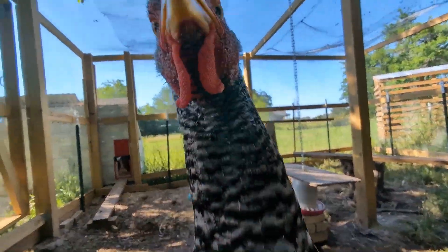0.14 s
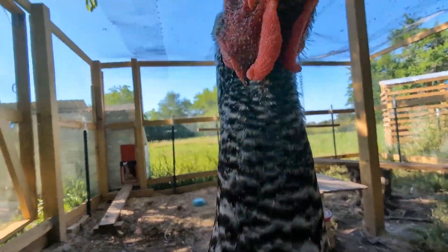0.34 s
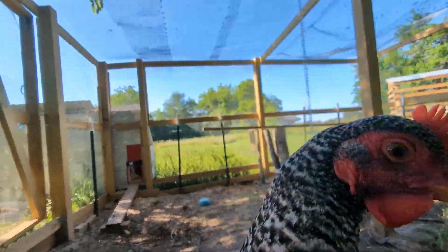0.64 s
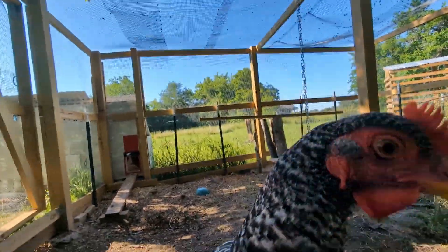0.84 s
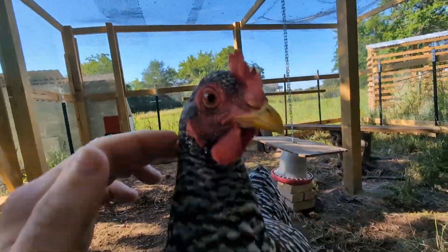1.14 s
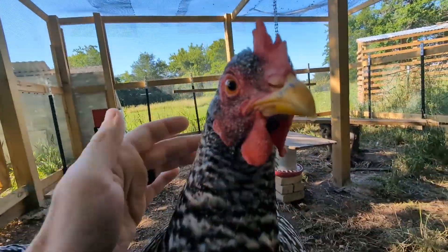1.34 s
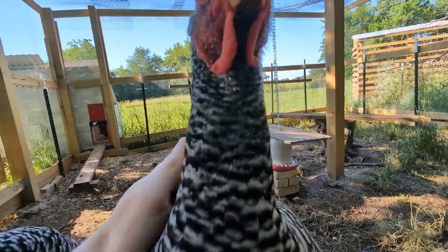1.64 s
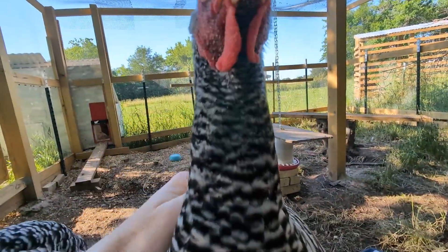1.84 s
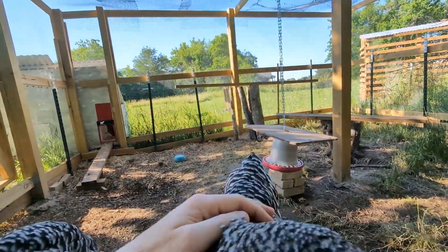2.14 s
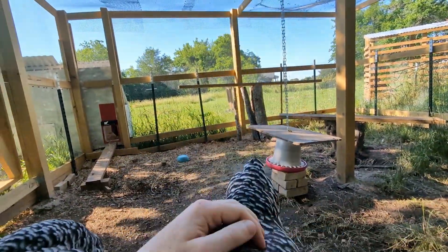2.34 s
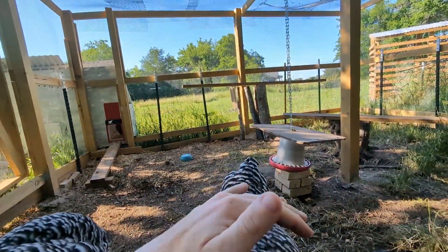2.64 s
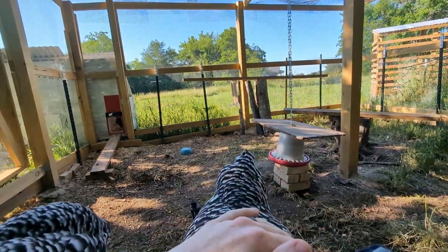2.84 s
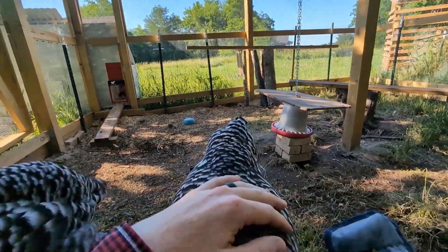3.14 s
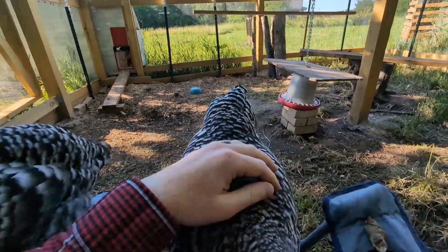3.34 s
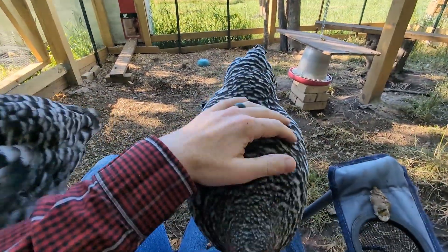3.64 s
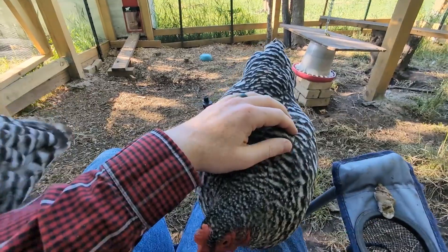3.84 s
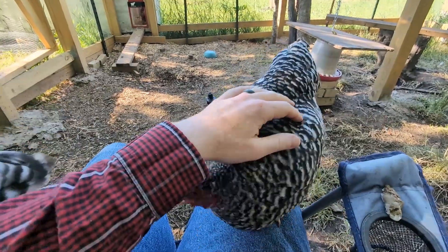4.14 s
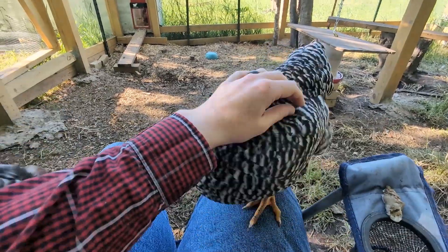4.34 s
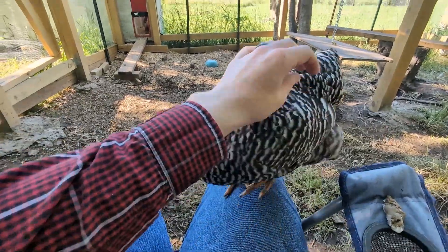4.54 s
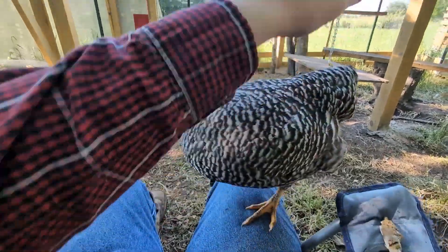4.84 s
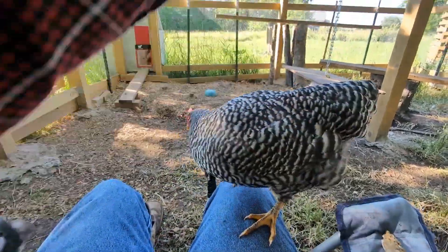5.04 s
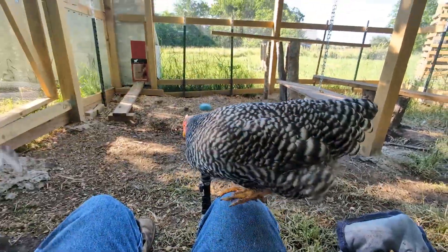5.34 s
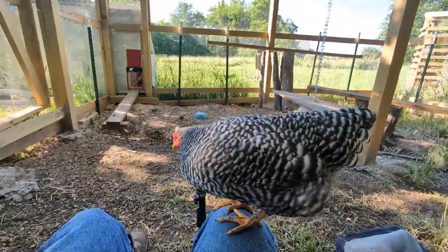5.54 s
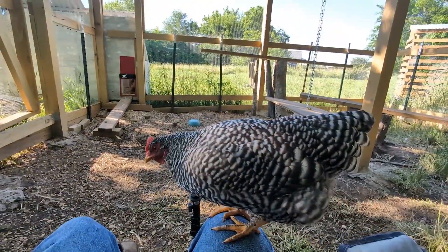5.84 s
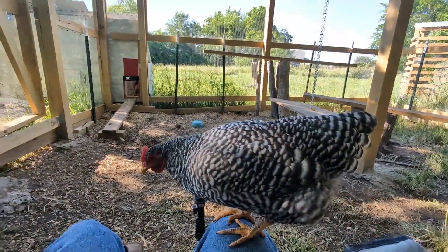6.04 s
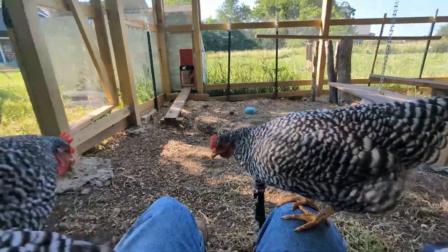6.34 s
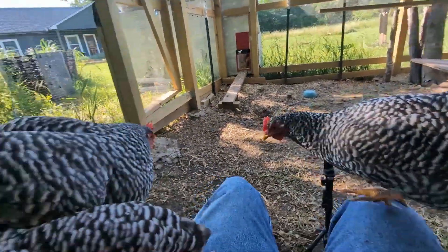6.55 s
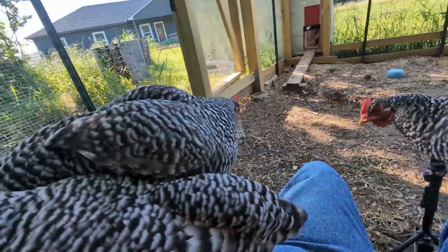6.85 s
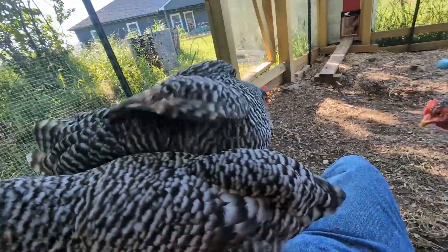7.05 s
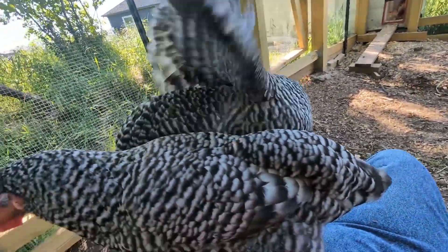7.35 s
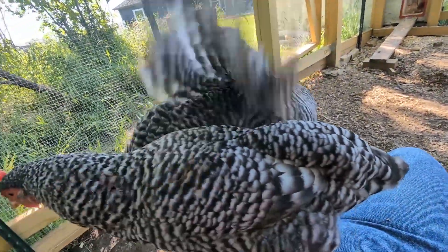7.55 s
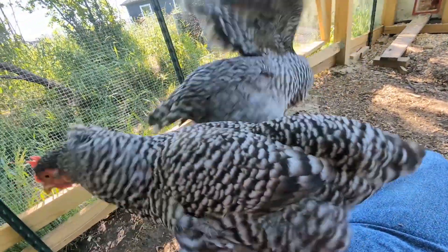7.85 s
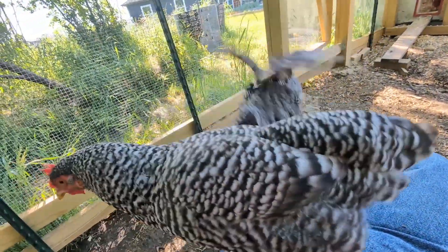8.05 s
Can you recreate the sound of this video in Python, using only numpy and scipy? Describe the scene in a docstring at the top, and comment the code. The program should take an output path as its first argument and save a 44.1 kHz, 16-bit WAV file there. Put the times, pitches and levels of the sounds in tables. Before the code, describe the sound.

Close stereo microphone among hens outdoors, dry with hardly any echo. Quick feather sweeps open; a smooth rising whine overlaps a second hen's low, jumping murmurs. Then come soft hissing strokes over plumage and light ticks, followed by rough, rapid clucks. Near the end, beaks and claws knock and wings flutter briefly, puffing air at the microphone. Behind lie low air, a faint engine hum, thin bird whistles and insects.

```python
"""Young hens in an outdoor run

A hen draws out a rising whine while another answers in low, breaking notes; hoarse clucks follow. Voices are
summed harmonics that roughen. Feathers hiss, rustle and flap as shaped noise; beaks and claws set ringing modes
ticking. Far off, an engine idles as steady sines, birds whistle thinly and insects shrill as narrow noise.
"""
import sys
import numpy as np
from scipy import signal
from scipy.io import wavfile
from scipy.ndimage import uniform_filter1d

SR = 44100
rng = np.random.default_rng(int(sys.argv[2]) if len(sys.argv) > 2 else 0)


def unload_audio(sound):
    """Save the sound as a 16-bit wav file, at the path given as the first command line argument."""
    columns = np.transpose(np.atleast_2d(sound))
    # keep every value between -1 and 1, then stretch to whole-number steps
    steps = np.round(np.clip(columns, -1, 1) * 32767)
    wavfile.write(sys.argv[1], SR, steps.astype(np.int16))


N = 361179
TIME = np.arange(N) / SR


def from_db(db):
    """Decibels to gain."""
    return 10 ** (np.asarray(db) / 20)


def rms_one(x):
    """Scale to unit power."""
    return x / np.sqrt(np.mean(x ** 2) + 1e-20)


def in_time(rows, t=TIME):
    """Each column of a curve at the times t."""
    s, *columns = np.transpose(rows)
    return [np.interp(t, s, c) for c in columns]


def at_hz(points, hz):
    """Read a spectrum on a log-frequency axis."""
    point_hz, values = np.array(points).T
    return np.interp(np.log(hz), np.log(point_hz), values)


def drift(rate, size=N):
    """Smooth chance of spread 1 that changes about rate times a second."""
    r = np.exp(-20 * np.pi * rate / SR)
    # drawn at a tenth of the sample rate, after the filter has settled
    draws = rng.standard_normal(size // 10 + 4002)
    slow = signal.lfilter([1], [1, -2 * r, r * r], draws)[4000:]
    return np.interp(np.arange(size) / 10, np.arange(len(slow)), rms_one(slow))


def complex_drift(rate, size=N):
    """Two independent drifts as one complex signal, to smear a tone into a narrow band."""
    return drift(rate, size) + 1j * drift(rate, size)


def ring(clicks, hz, t60):
    """A unit click sets a decaying sine of height 1 ringing."""
    r = from_db(-60 / (t60 * SR))
    w = 2 * np.pi * hz / SR
    return signal.lfilter([0, np.sin(w)], [1, -2 * r * np.cos(w), r * r], clicks + 1e-18)


def panned(left_db):
    """Gains of the two sides for a left-minus-right level."""
    return from_db(left_db * np.array([[.5], [-.5]]))


def add(out, start, sound):
    """Mix a stereo sound in from a given time."""
    at = max(round(start * SR), 0)
    out[:, at:at + sound.shape[1]] += sound[:, :max(N - at, 0)]


def fade(age, attack_s, release_s):
    """Attack, hold and release over the given times."""
    return np.clip(np.minimum(age / attack_s, (age[-1] - age) / release_s), 0, 1)


def coloured(spectrum, grain_db, patchy_db, tilt_db=0, size=N):
    """Stereo noise in half-octave bands; grain gathers it into tiny snaps, patches make the bands flicker."""
    # Left-right likeness of the noise. Each row: frequency in Hz, correlation from -1 to 1.
    likeness = [(60, 0.79), (300, 0.95), (700, 0.42), (1200, -0.32), (2200, -0.21), (15000, 0.069)]
    edges = np.geomspace(30, 17000, 19)
    grain = from_db(grain_db * np.clip(drift(300, size), -3, 3))
    white = rng.standard_normal((2, 2, size)) * grain
    out = 0
    for k, (low, high) in enumerate(zip(edges, edges[1:])):
        hz = np.sqrt(low * high)
        if spectrum[0][0] < 1.5 * high and low < 1.5 * spectrum[-1][0]:
            band = signal.butter(2, [low, high], "band", fs=SR, output="sos")
            mid, side = signal.sosfilt(band, white[k % 2])
            alike = np.clip(at_hz(likeness, hz), -1, 1)
            flicker_db = patchy_db * drift(11.2, size)
            gain = from_db(at_hz(spectrum, hz) + tilt_db * np.log2(hz) + flicker_db)
            out = out + gain * (np.sqrt(1 + alike) * mid + np.sqrt(1 - alike) * side * [[1], [-1]])
    return rms_one(out)


def hen(pitch, level, overtone_db, rough, throat, pan_db, rattle_hz, fall_db, bite_db,
        depth=1, jitter=0.049, bearing=1, count=14):
    """The syrinx sounds a fundamental with overtones shaped by the throat; when rough, its cycles rattle."""
    # How far the left side leads the right. Each row: frequency in Hz, lead in radians before bearing scales it.
    port_lead = [(200, 0), (380, .9), (620, 1.2), (820, 2.25), (950, 2.7), (1060, 3.0), (1350, 3.9),
                 (1700, 5.9), (2100, 6.3), (4300, 7)]
    size = len(pitch)
    rough = np.clip(rough, 0, 1)
    wobble = 1 + .0015 * drift(30, size) + jitter * rough * drift(90, size)
    phase = 2 * np.pi * np.cumsum(pitch * wobble) / SR
    # the membranes slap unevenly every few cycles, which throws sidebands around each partial
    flap = 2 * np.pi * np.cumsum(rattle_hz * (1 + .13 * drift(30, size))) / SR
    slap = np.clip(depth * rough, 0, 1)
    level = level * (1 + .8 * slap * np.sin(flap))
    out = np.zeros((2, size))
    for k in range(1, count + 1):
        hz = k * pitch
        bite = bite_db * np.sqrt(rough) * (hz > 2700)   # hard slaps recolour the top
        gain = 1 if k == 1 else from_db(overtone_db + at_hz(throat, hz) - fall_db * (k - 3.0) + bite)
        # turbulence smears every partial, the high ones most
        rasp = from_db(-10) * rough * np.sqrt(k) * complex_drift(110, size)
        partial = level * gain * (1 + rasp) * np.exp(1j * k * (phase + .5 * slap * np.cos(flap)))
        lead = bearing * at_hz(port_lead, hz) * np.array([[.5], [-.5]])
        side_gain = panned(pan_db * np.minimum(hz / 1000, 2))   # pans wider with frequency
        out += side_gain * np.real(partial * np.exp(1j * lead))
    return out


def notes(table, crack, **voice):
    """Short notes: each opens with any crack, swells and glides along a shallow, wavering arch, and stops."""
    out = np.zeros((2, N))
    for start, end, first_hz, last_hz, arch_hz, level_db, overtone_db, rough in table:
        age = TIME[:max(round((end - start) * SR), 200)]
        along = age / age[-1]
        arch = np.sin(np.pi * along)
        glide = first_hz + (last_hz - first_hz) * along + arch_hz * arch
        pitch = glide * (1 + .005 * drift(46, len(age)))
        swell_db = arch - .5
        shimmer_db = 1.5 * drift(52, len(age))
        level = from_db(level_db + swell_db + shimmer_db) * fade(age, attack_s=0.0046, release_s=.011)
        roughness = rough + crack * np.exp(-age / 0.009)   # the crack dies within milliseconds
        add(out, start, hen(pitch, level, overtone_db, roughness, **voice))
    return out


def long_whine():
    """One drawn-out call, louder as it climbs, clean in the middle, strained at both ends, breaking downward."""
    # Pitch of the rising call. Each row: time in seconds, pitch in Hz.
    whine_pitch = [(1.535, 647), (1.597, 588.3), (1.665, 631.9), (1.739, 650.7), (1.805, 727.4),
                   (1.825, 705), (1.835, 792), (1.939, 842), (2.123, 870.4), (2.469, 1042), (2.559, 1015),
                   (2.719, 1074), (2.78, 1043)]
    # The voice jumps between registers, one note in each. Each row: start in seconds, end in seconds,
    # first pitch in Hz, last pitch in Hz, arch in Hz, fundamental in dB before the mix,
    # overtones in dB re the fundamental before the throat, roughness from 0 to 1.
    register_break = [(2.772, 2.83, 960, 872, 0.0049, -42.5, -11, 0.4)]
    # Her throat's colour over the overtones. Each row: frequency in Hz, gain in dB.
    throat = [(1200, -9), (1700, -16.5), (2150, -17.5), (2600, -29.5), (3150, -25.5), (4200, 5), (4700, -4),
              (6200, -13.5), (9000, -34)]
    voice = dict(throat=throat, pan_db=-1.5, rattle_hz=137, fall_db=17.5, bite_db=1.5)
    start_s, end_s = 1.522, 2.86
    mid_db, swell_db_per_octave, mid_hz = -32.5, 12, 820   # level before the mix, at the middle pitch
    clean_overtones_db, strain_db = -27.5, 28   # strain: the overtones' gain at full roughness
    age = TIME[:round((end_s - start_s) * SR)]
    pitch, = in_time(whine_pitch, start_s + age)
    catch = np.exp(-age / 0.055)
    fray = np.exp((age - age[-1]) / 0.047)
    rough = 0.2 * catch + 0.5 * fray
    climb_db = swell_db_per_octave * np.log2(pitch / mid_hz)
    catch_loss_db = 6.5 * catch   # the voice starts weak
    level = from_db(mid_db + climb_db - catch_loss_db + .5 * drift(12, len(age)))
    level = level * fade(age, attack_s=0.0066, release_s=0.17)
    overtone_db = clean_overtones_db + strain_db * rough + 2 * drift(11, len(age))
    out = notes(register_break, crack=0, **voice)
    add(out, start_s, hen(pitch, level, overtone_db, rough, **voice))
    return out


def low_answer():
    """A second hen's low notes jump in pitch, each opening with a strong rough crack of the syrinx."""
    # Each row: start in seconds, end in seconds, first pitch in Hz, last pitch in Hz, arch in Hz,
    # fundamental in dB before the mix, overtones in dB re the fundamental before the throat, roughness from 0 to 1.
    answer_notes = [(1.495, 1.525, 385, 395, 5.5, -56, -30, 0.63),
                    (1.545, 1.635, 577, 569, -30.5, -43, -26, 0.049),
                    (1.781, 1.805, 239, 277, 3.5, -42.5, -12.5, 0.62),
                    (1.792, 1.852, 349, 363, 26.5, -37, -16, .4),
                    (1.957, 2.022, 613, 497, -12.5, -41, -10, 0.11),
                    (2.016, 2.08, 531, 473, 57.5, -44.5, -8.5, .03),
                    (2.073, 2.153, 373, 359.5, 19, -36.5, -13, 0.16),
                    (2.147, 2.3, 559, 603.5, 14, -37, -5, 0.025)]
    # Her throat's colour over the overtones. Each row: frequency in Hz, gain in dB.
    throat = [(500, 20), (760, -3.5), (1150, 6.5), (1520, 1.5), (1800, -9.5), (2350, -10.5), (2900, -31.5),
              (4500, -25.5), (5500, -39), (9000, -33.5)]
    return notes(answer_notes, crack=0.49, throat=throat, pan_db=-3.5, rattle_hz=119, fall_db=0.8,
                 bite_db=-4.5, bearing=0.27, count=9)


def hoarse_clucks():
    """A string of short notes, many of them roughened by the rattling syrinx."""
    # Each row: start in seconds, end in seconds, first pitch in Hz, last pitch in Hz, arch in Hz,
    # fundamental in dB before the mix, overtones in dB re the fundamental before the throat, roughness from 0 to 1.
    cluck_notes = [(5.567, 5.628, 342, 368, 0, -45.5, -3, 0.75), (5.618, 5.672, 482, 456, 5, -47, -17, .08),
                   (5.662, 5.728, 452, 418, -30, -51.5, 7.5, 0.18),
                   (5.779, 5.83, 377, 347, 3, -44.5, -6, 0.75),
                   (5.822, 5.868, 578, 590, 0.5, -46.5, -4, 0.086),
                   (5.858, 5.886, 328, 346, 1, -46, 1.5, 0.64), (5.862, 5.905, 539, 538, 1, -42, -8, 0.99),
                   (5.893, 5.99, 580, 606, 13.5, -41, 1, 0.065),
                   (5.958, 6.07, 492, 516, -35, -41, -4.5, 0.55),
                   (6.063, 6.14, 615, 630, -16, -42, -17, 0.034),
                   (6.125, 6.153, 286, 321, 7, -45.5, -4, .7),
                   (6.132, 6.175, 606, 498, 1.5, -36.5, -6, 0.78), (6.158, 6.205, 503, 468, 1, -49, 7, 0.7),
                   (6.292, 6.345, 398, 339, 14.5, -45, 0, .55),
                   (6.316, 6.376, 550, 464, 22.5, -37.5, -2.5, 0.96)]
    # The throat's colour over the overtones. Each row: frequency in Hz, gain in dB.
    throat = [(700, -4.5), (1050, -3), (1250, -4.5), (1500, -11.5), (1750, -22), (2200, -34), (3500, -33.5),
              (5200, -27.5), (7000, -32)]
    return notes(cluck_notes, crack=0.17, throat=throat, pan_db=0.0, rattle_hz=112.3, fall_db=2.0,
                 bite_db=5.5, depth=0.71)


def sweep(rise_s, fall_s, tilt_db, grain_db):
    """Feathers sweep past, their quills flicking in quick succession."""
    # Colour of the feathers. Each row: frequency in Hz, relative density in dB per Hz before the tilt.
    feather_colour = [(150, -34.5), (400, -2), (900, 4), (1600, 7), (2500, 1), (4000, 0.5), (6000, -7.5),
                      (8000, -8), (12000, -25), (16000, -11)]
    age = TIME[:round((rise_s + fall_s) * SR)]
    noise = coloured(feather_colour, grain_db, patchy_db=2.0, tilt_db=tilt_db, size=len(age))
    return fade(age, rise_s, fall_s) * noise


def brushes():
    """A wing or neck brushes by in a quick sweep of coloured noise."""
    # Each row: peak in seconds, rise in seconds, fall in seconds, level in dB,
    # treble tilt in dB per octave, left-minus-right level in dB.
    brush_rows = [(0.254, 0.0068, 0.07, -35, 0.5, 1), (.33, 0.063, 0.11, -45.5, 0, -5.5),
                  (.685, 0.045, 0.028, -56, -1.5, -11), (.826, .004, 0.061, -49, 1, -10.5),
                  (.951, 0.091, 0.026, -57.5, -1, 19.5), (.972, .011, 0.032, -40.5, 1, 17.5),
                  (1.067, .06, 0.016, -44.5, 2, 17.5), (2.134, .025, 0.039, -43, -4.5, -8.5),
                  (3.799, 0.028, 0.043, -48, 12, 0), (3.977, 0.039, 0.048, -52, 17, 4),
                  (4.128, 0.022, 0.021, -52, 1, -2), (4.195, .036, 0.073, -50, 11, 0),
                  (4.284, 0.0092, .06, -56.5, 3.5, 0), (4.506, 0.0045, 0.05, -75, -0.5, -7),
                  (4.66, 0.0052, 0.024, -54, 2.5, 0), (4.855, 0.014, .04, -53.5, 9, 0),
                  (5.312, 0.029, 0.043, -48.5, 5, 1.5), (6.619, .1, 0.2, -54, 1.5, -3),
                  (7.18, 0.18, .12, -62.5, 2.5, -0.5), (7.405, 0.072, .035, -49, 4, 3.5),
                  (8.093, 0.0069, .022, -44, 0, -4)]
    out = np.zeros((2, N))
    for peak, rise, fall, level_db, tilt_db, pan_db in brush_rows:
        sound = sweep(rise, fall, tilt_db, grain_db=1.5)
        add(out, peak - rise, from_db(level_db) * panned(pan_db) * sound)
    return out


def flutter():
    """A hen beats her wings at a steady rate, one crisp sweep to a beat."""
    # A burst of evenly spaced wing beats. Each entry: level of one beat in dB.
    beat_levels = [-39.5, -49.5, -40, -47, -47]
    first_beat_s, beat_spacing_s = 7.596, 0.068
    rise_s, fall_s, tilt_db = .017, .056, 5   # tilt in dB per octave
    out = np.zeros((2, N))
    for k, level_db in enumerate(beat_levels):
        beat = sweep(rise_s, fall_s, tilt_db, grain_db=2.5)
        add(out, first_beat_s + k * beat_spacing_s - rise_s, from_db(level_db) * beat)
    return out


def plumage():
    """Barbs slide under the hand: each stroke swells a hiss, a softer rustle and a rubbing note that rises."""
    # Strokes of hand and sleeve on plumage. Each row: peak in seconds, rise in seconds, fall in seconds,
    # hiss in dB before its trim, rustle in dB before its trim.
    strokes = [(.14, 0.037, 0.18, -58.5, -56.5), (.33, 0.18, 0.035, -80, -54),
               (.57, 0.047, 0.14, -99, -62.5), (1.27, 0.12, 0.11, -77, -67), (3.25, 0.16, 0.29, -59.5, -55),
               (3.591, 0.19, 0.05, -53, -51), (4.0, 0.24, 0.53, -67, -64), (4.7, 0.28, 0.37, -64.5, -56.5),
               (5.0, 0.21, 0.15, -57, -56.5), (5.45, 0.54, 0.35, -64.5, -59.5),
               (6.119, 0.34, 0.17, -67, -61.5), (6.62, 0.25, 0.26, -74.5, -55),
               (7.36, 0.33, 0.11, -69.5, -62.5), (8.151, 0.77, .25, -64.5, -57.5)]
    # Bright part of the rub. Each row: frequency in Hz, relative density in dB per Hz.
    hiss_colour = [(2500, -50), (4000, -12), (6000, 4), (8000, 15), (11000, 0.5), (15500, 7)]
    # Softer, lower part of the rub. Each row: frequency in Hz, relative density in dB per Hz.
    rustle_colour = [(250, 3.5), (500, -2.5), (1100, -14.5), (1700, 0.5), (2300, 6), (3200, -8),
                     (4500, 6.5), (6000, -18.5), (8000, -39)]
    rub_hz, rub_rise_hz, rub_width_hz, rub_db = 2140, 550, 260, -7   # the rise is that of the strongest rustle
    # a faint constant rustle, left out from 0.96 to 2.93 s, around the whine
    faint_rustle_on = 1. * ((TIME < 0.96) | (TIME > 2.93))
    rustle_power = from_db(-65) ** 2 * uniform_filter1d(faint_rustle_on, size=SR // 8).clip(0)
    hiss_power = 0
    for peak, rise, fall, hiss_db, rustle_db in strokes:
        distance = (TIME - peak) / np.where(TIME < peak, rise, fall)
        swell = np.exp(-np.minimum(distance ** 2, 20))
        hiss_power = hiss_power + (from_db(hiss_db) * swell) ** 2
        rustle_power = rustle_power + (from_db(rustle_db) * swell) ** 2
    hiss_noise = from_db(0.5) * coloured(hiss_colour, grain_db=2.0, patchy_db=1.5)
    hiss = np.sqrt(hiss_power) * panned(left_db=1.0) * hiss_noise
    speed = rustle_power / rustle_power.max()
    carrier = np.exp(2j * np.pi * np.cumsum(rub_hz + rub_rise_hz * speed) / SR)
    rub = from_db(rub_db) * np.array([np.real(carrier * complex_drift(rub_width_hz)) for ear in range(2)])
    rustle = from_db(-1) * coloured(rustle_colour, grain_db=2.5, patchy_db=1.2)
    return hiss + np.sqrt(rustle_power) * panned(left_db=-6.0) * (rustle + rub)


def ticks(modes, column, gain_db, scuff, scuff_s):
    """Each peck or step is a click and a brief scuff, striking every mode with a strength of its own."""
    # Beaks and claws. Each row: time in seconds, low knock in dB and bright snap in dB, both before gain_db.
    tick_rows = [(0.482, -55.5, -78), (1.249, -46.5, -63.5), (2.1, -65.5, -54), (3.643, -72, -43.5),
                 (3.718, -54, -78), (3.788, -48.5, -62), (4.066, -56, -60), (4.117, -46, -53),
                 (4.185, -49, -62), (4.312, -52, -68), (4.506, -52.5, -55), (5.384, -61, -52),
                 (5.936, -47, -51), (6.606, -44.5, -39.5), (6.922, -52, -56), (6.949, -38.5, -39.5),
                 (7.015, -55, -54), (7.514, -39.5, -43.5), (7.577, -39.5, -50), (7.675, -52.5, -44),
                 (7.899, -48.5, -42), (7.976, -43.5, -42), (8.038, -45, -46)]
    out = np.zeros((2, N))
    age = TIME[:2000]
    for hz, mode_db, t60 in modes:
        force = np.zeros((2, N + len(age)))
        for row in tick_rows:
            touch = scuff * rng.standard_normal((2, len(age))) * np.exp(-age / scuff_s)
            touch[:, 0] += 1
            at = round(row[0] * SR)
            strength_db = row[column] + gain_db + mode_db + rng.normal(0, 1.2)
            force[:, at:at + len(age)] += touch * from_db(strength_db)
        out += ring(force[:, :N], hz, t60)
    return out


def knocks():
    """The low ring of whatever beaks and claws strike."""
    # Each row: mode frequency in Hz, level in dB, decay time t60 in seconds.
    knock_modes = [(303, 0, 0.021), (525, -0.5, 0.022), (833, -11, 0.017), (1220, 2.5, 0.0042)]
    return ticks(knock_modes, column=1, gain_db=2.5, scuff=0.047, scuff_s=0.0098)


def snaps():
    """The bright, mostly shorter ring of the same strikes."""
    # Each row: mode frequency in Hz, level in dB, decay time t60 in seconds.
    snap_modes = [(1750, -10, 0.061), (2560, 10.5, 0.0034), (3240, -0.5, 0.0082), (4080, 2, 0.0077),
                  (5910, 3, 0.0068), (7500, -33, 0.0017), (11600, -28, .003)]
    return ticks(snap_modes, column=2, gain_db=-2.5, scuff=0.19, scuff_s=0.0047)


def puffs(sway_hz=58):
    """Air pushed by wings and bodies rocks the microphone for a few slow cycles."""
    # Each row: centre in seconds, level in dB, length in seconds.
    puff_rows = [(0.27, -40.5, 0.013), (3.804, -42.5, 0.018), (4.204, -41.5, 0.022), (7.608, -35.5, 0.029),
                 (7.765, -34.5, 0.0086), (7.844, -39.5, 0.042)]
    swell = sum(from_db(db) * np.exp(-.5 * ((TIME - s) / length) ** 2) for s, db, length in puff_rows)
    sway = np.sqrt(2) * np.sin(2 * np.pi * np.cumsum(sway_hz * (1 + 0.1197 * drift(16.9))) / SR)
    rumble = coloured([(50, 3), (120, 4), (300, -6), (700, -19.0)], grain_db=1.0, patchy_db=-3.0)
    return swell * (sway + from_db(-4.5) * rumble)


def pen(x, t60, wall_hz):
    """Sparse dull reflections from posts, roof and ground."""
    age = TIME[:SR // 2]
    sparse = rng.standard_normal((2, len(age))) * (rng.random((2, len(age))) < .05)
    echoes = sparse * from_db(-60 * age / t60) * (age > .004)
    echoes = signal.sosfilt(signal.butter(1, wall_hz, fs=SR, output="sos"), echoes)
    return signal.fftconvolve(x, echoes / np.sqrt(np.sum(echoes ** 2) / 2), axes=1)[:, :N]


def engine():
    """A far idle: the firing note and its wavering neighbours."""
    # Loudness of the idle. Each row: time in seconds, level in dB before a 1 dB lift.
    engine_level = [(0.0, -61.5), (0.23, -52), (1.19, -50.5), (1.71, -58), (2.12, -46.5), (3.26, -46.5),
                    (3.92, -52.5), (4.33, -46), (5.45, -46.5), (6.11, -44), (6.59, -49.5), (7.25, -47.5),
                    (7.62, -45), (8.19, -48.5)]
    # Orders of the engine. Each row: multiple of the firing rate, mean level in dB.
    engine_orders = [(.75, -18.5), (1, 0), (1.25, -19.5), (1.5, -14.5), (1.75, -14.5), (2, -21), (3, -24.5),
                     (3.99, -15.5), (4.6, -30)]
    level_db, = in_time(engine_level)
    phase = 2 * np.pi * 69.78 * TIME   # firing rate in Hz
    orders = 0
    for k, db in engine_orders:
        wander = 0.14 * k * drift(2.4) + rng.uniform(0, 2 * np.pi)
        orders = orders + from_db(db + drift(0.33)) * np.sin(k * phase + wander)
    return from_db(level_db + 1) * orders


def wild_birds():
    """Thin gliding whistles, blurred by the trees."""
    # Each row: start in seconds, end in seconds, first pitch in Hz, last pitch in Hz, level in dB before the blur.
    whistles = [(0, .14, 2280, 1750, -57), (2.766, 3.073, 5950, 5650, -57.5), (2.8, 3.1, 4920, 5010, -65),
                (3.672, 4.113, 3260, 2400, -65), (5.172, 5.461, 6100, 5950, -49.5),
                (5.22, 5.45, 5080, 5200, -55.5), (6.298, 6.57, 2090, 2205, -73),
                (6.538, 6.856, 6040, 5770, -51), (6.558, 6.847, 5150, 4940, -59.5)]
    out = np.zeros((2, N))
    for start, end, first_hz, last_hz, level_db in whistles:
        span = (TIME >= start) & (TIME < end)
        along = np.linspace(0, 1, span.sum())
        phase = 2 * np.pi * np.cumsum(first_hz + (last_hz - first_hz) * along ** 2) / SR
        level = from_db(level_db) * np.interp(along, [0, .3, 1], [0, 1, 0])
        for ear in out:
            blur = .6 + .4 * complex_drift(35, len(along))
            ear[span] += level * np.real(blur * np.exp(1j * phase))
    return out


def insects(hz=5270, width_hz=160, level_db=-75):
    """A thin steady shrill from the meadow: a tone smeared into narrow noise."""
    carrier = np.exp(2j * np.pi * hz * TIME)
    return from_db(level_db) * np.array([np.real(carrier * complex_drift(width_hz)) for ear in range(2)])


def outdoor_air():
    """A continuous bed of mostly low noise with gently flickering bands."""
    # Each row: frequency in Hz, relative density in dB per Hz.
    air_colour = [(45, -11), (70, 4), (120, -4), (180, -13.5), (300, -13), (450, -20.5), (900, -25),
                  (1800, -25), (3500, -35.5), (6000, -40), (8000, -49), (15000, -51)]
    return from_db(-55) * coloured(air_colour, grain_db=1.0, patchy_db=3.5)


def scene():
    """Hens and their feathers in front, the yard behind."""
    voices = from_db(6) * long_whine() + from_db(3.5) * low_answer() + from_db(4.0) * hoarse_clucks()
    near = voices + brushes() + flutter() + knocks() + snaps()
    echoes = from_db(-27) * pen(near, t60=.12, wall_hz=4000)
    yard = engine() + wild_birds() + insects() + outdoor_air()
    return near + echoes + plumage() + puffs() + yard


def record(dry):
    """The deepest rumble is rolled off and the top is cut steeply."""
    dry = signal.sosfilt(signal.butter(6, 42, "high", fs=SR, output="sos"), dry)
    return signal.sosfilt(signal.ellip(10, .1, 70, 15900, fs=SR, output="sos"), dry)


dry = scene()
out = record(dry)
unload_audio(out)
```